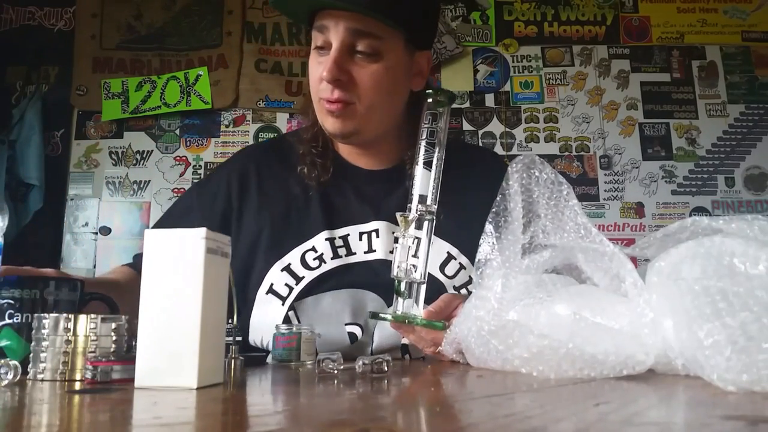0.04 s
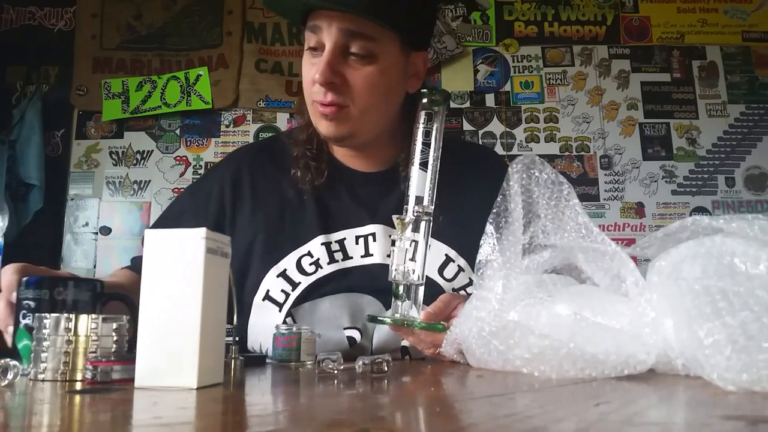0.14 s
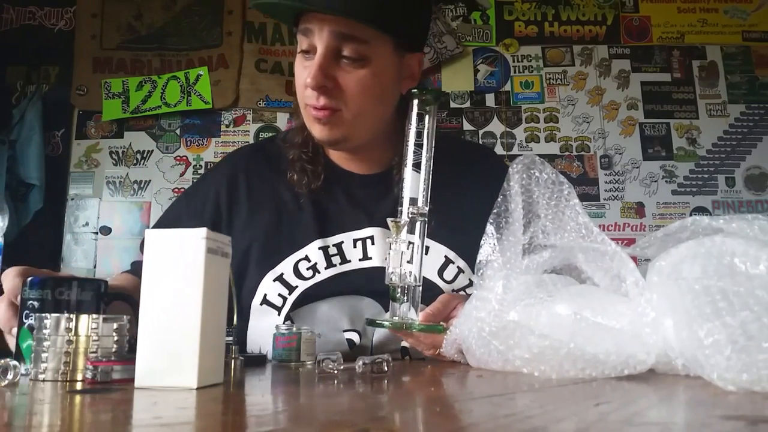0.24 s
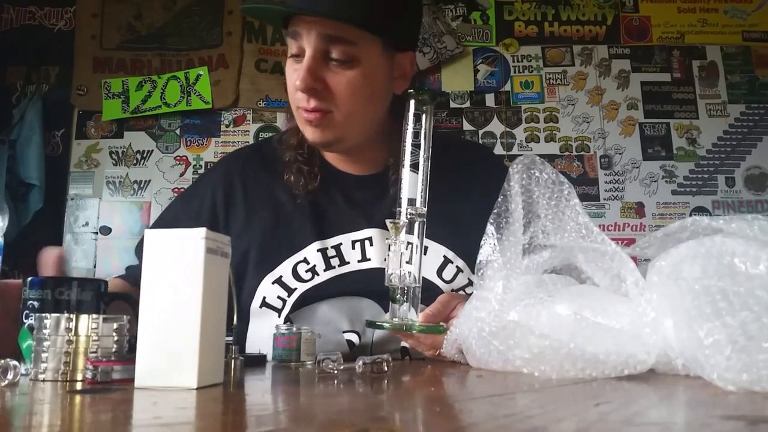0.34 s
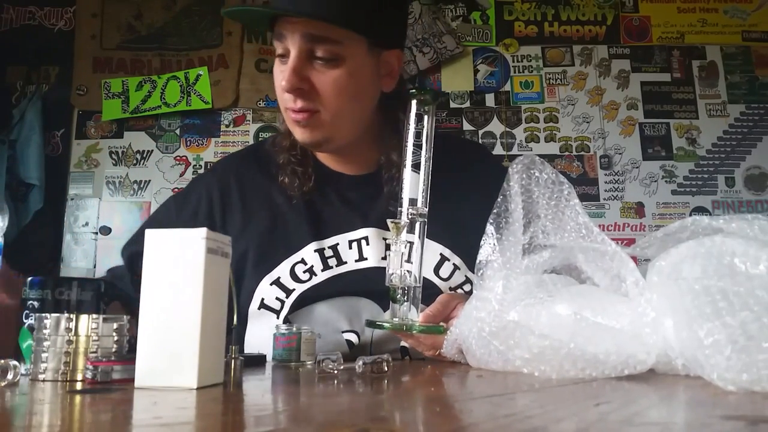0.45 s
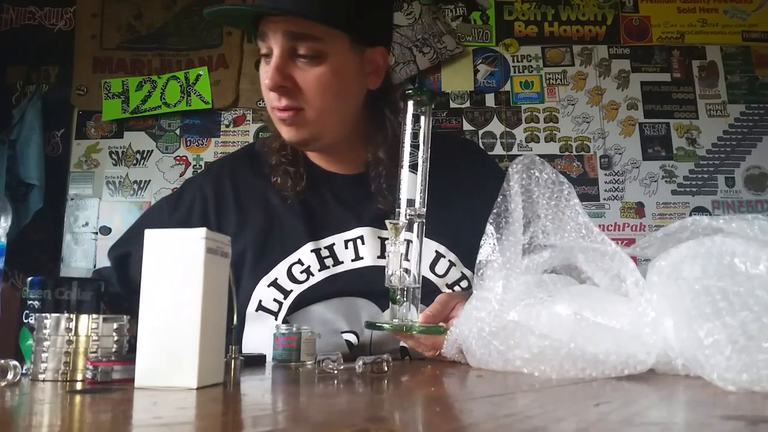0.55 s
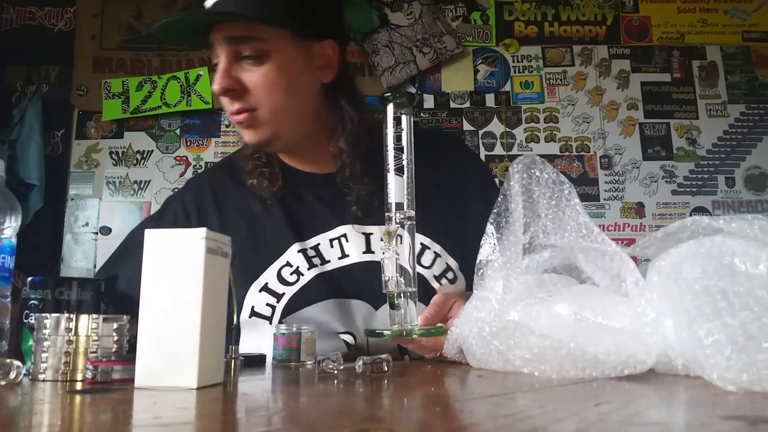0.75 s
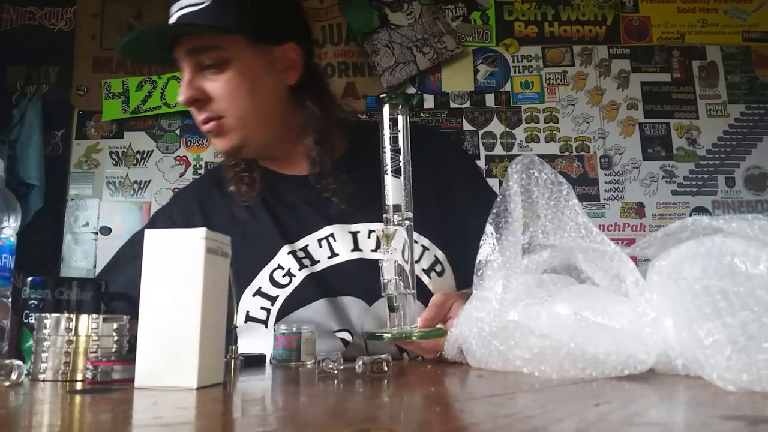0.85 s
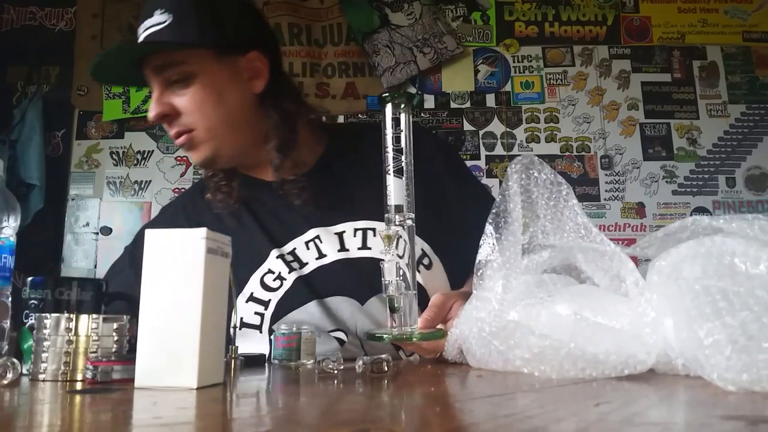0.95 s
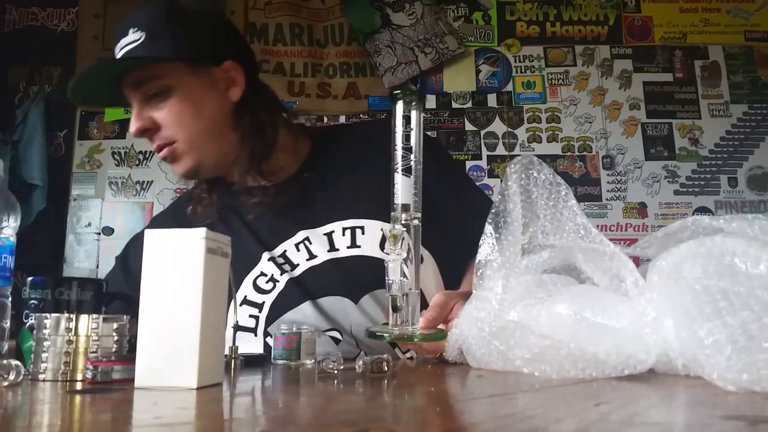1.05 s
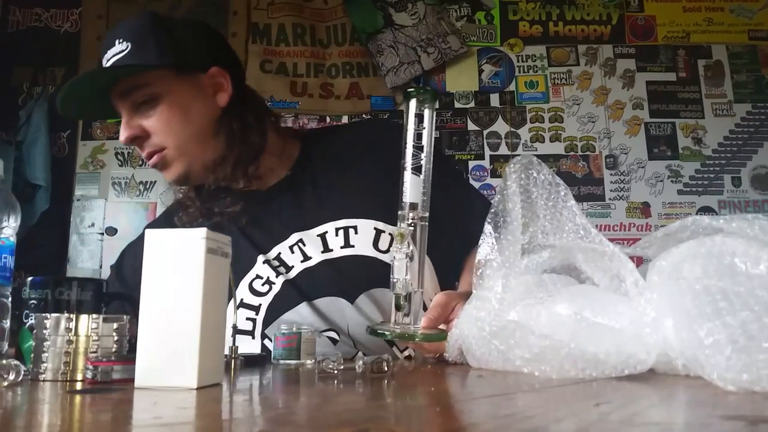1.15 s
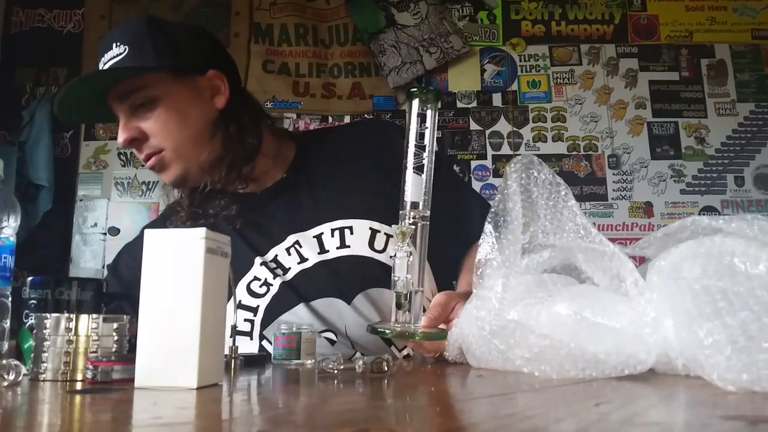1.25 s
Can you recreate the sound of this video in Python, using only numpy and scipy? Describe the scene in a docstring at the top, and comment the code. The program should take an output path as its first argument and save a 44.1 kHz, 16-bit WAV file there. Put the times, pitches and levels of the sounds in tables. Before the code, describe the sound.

A glass piece is set down hard on a wooden table with a sharp, ringing clink

```python
"""A small room, a wooden table and two microphones. Plastic wrap crackles faintly while things bump and shuffle,
and a glass piece rasps as it slides out, ending in a short groan: filtered noise and a wavering sine.
At 0.22 s the glass is set down hard: decaying modes clink and boom under bursts of noise.
Soft bumps, light knocks, hollow thumps and two faint tings follow, from clicked resonators and dying noise;
the wrap ticks and things shuffle on to the end, over a steady floor of coloured noise."""
import sys
import numpy as np
from scipy import signal
from scipy.fft import rfft, irfft
from scipy.io import wavfile
from scipy.ndimage import uniform_filter1d

SR = 44100
rng = np.random.default_rng(int(sys.argv[2]) if len(sys.argv) > 2 else 0)


def inscribe(sig):
    """Save sig as 16-bit PCM at rate SR to the path in sys.argv[1].

    A 1-D sig is mono; a 2-D sig holds one channel per row.
    Samples are clipped to [-1, 1] before scaling.
    """
    pcm = np.round(np.clip(np.atleast_2d(sig).T, -1, 1) * 32767)
    wavfile.write(sys.argv[1], SR, pcm.astype(np.int16))


N = 57330
TIME = np.arange(N) / SR
FREQS = np.maximum(np.fft.rfftfreq(2 * N, 1 / SR), 1)
ROOM_T60_S = 0.25

# the glass meets the table and rocks once: (time [s], strength [dB])
CLINKS = [(0.2248, 0.5), (0.2272, -2), (0.2335, -19.5)]
# relative spectrum of the bright crack of a hard contact: (frequency [Hz], level [dB])
CRACK_SPECTRUM = [(4500, -22.5), (7500, -23.5), (9300, -25.5), (10700, -11), (12500, 3.5), (14500, 1),
                  (15800, -5.5)]
# relative spectrum of a knock on the table: (frequency [Hz], level [dB])
KNOCK_SPECTRUM = [(150, -13), (280, -24), (400, 0), (600, 0), (950, -4.5), (1500, -12.5), (2100, -5.5),
                  (2800, -9), (3400, -38), (5000, -30.5)]


def from_db(db):
    """Decibels to gain."""
    return 10 ** (np.asarray(db) / 20)


def rms_one(x):
    """Scale to unit rms."""
    return x / np.sqrt(np.mean(x ** 2) + 1e-20)


def pan(db):
    """Left and right gains for a level difference; positive is louder on the left."""
    return rms_one(from_db([[db / 2], [-db / 2]]))


def level(rows):
    """Gain over time from (time [s], level [dB]) points."""
    return from_db(np.interp(TIME, *np.transpose(rows)))


def clicks(rows):
    """One impulse for each (time [s], level [dB])."""
    out = np.zeros(N)
    for s, db in rows:
        out[int(s * SR)] += from_db(db)
    return out


def white():
    """White noise, partly alike at the two microphones."""
    likeness = 0.1  # correlation of left and right
    mid, side = rng.standard_normal((2, N))
    return rms_one(np.sqrt(1 + likeness) * mid + np.sqrt(1 - likeness) * side * [[1], [-1]])


def gains(spectrum):
    """Gain at each of FREQS from (frequency [Hz], level [dB]) points."""
    hz, db = np.transpose(spectrum)
    return from_db(np.interp(np.log(FREQS), np.log(hz), db))


def filtered(x, gain):
    """Causal minimum-phase filter, made through the cepstrum, with the given gain at each of FREQS."""
    cepstrum = irfft(np.log(gain + 1e-6))[:N]
    response = np.exp(2 * rfft(cepstrum, 2 * N) - cepstrum[0])
    return irfft(rfft(x, 2 * N) * response)[..., :N]


def colour(x, spectrum):
    """Give a noise a spectrum that falls away beyond its end points, keeping its power."""
    top_fall = np.sqrt(1 + (FREQS / spectrum[-1][0]) ** 20)
    bottom_fall = 1 + (spectrum[0][0] / 2 / FREQS) ** 2
    return filtered(x, rms_one(gains(spectrum) / top_fall / bottom_fall))


def lowpass(x, order, hz):
    """Soften a contact by removing what lies above hz."""
    return signal.sosfilt(signal.butter(order, hz, fs=SR, output="sos"), x)


def dying(hits, t60):
    """Envelope whose energy jumps at each hit and dies away by 60 dB in t60 seconds."""
    keep = from_db(-60 / (t60 * SR)) ** 2
    return np.sqrt(signal.lfilter([1], [1, -keep], hits ** 2 + 1e-24))


def ring(hits, hz, t60):
    """A damped resonator: a unit click sets a sine of height 1 ringing."""
    r, w = from_db(-60 / (t60 * SR)), 2 * np.pi * hz / SR
    return signal.lfilter([0, np.sin(w)], [1, -2 * r * np.cos(w), r * r], hits + 1e-18)


def room(x):
    """Diffuse reflections of the small room: convolution with dying noise."""
    tail = white() * from_db(-60 * TIME / ROOM_T60_S)
    return signal.fftconvolve(x, rms_one(tail) / np.sqrt(N), axes=1)[:, :N]


def set_down():
    """The hard blow rings the glass and the tabletop and adds a boom, a clack and a bright crack."""
    return glass() + tabletop() + blow_noise()


def glass():
    """Glass modes build up and die away; the higher ones flutter more as the piece settles."""
    # modes of the glass: (frequency [Hz], level [dB], t60 [s], left-right [dB], build-up time constant [s])
    glass_modes = [ (2481, -23.5, .25, -1, .001), (2607, -25, .24, 1, .001), (2655, -24.5, .24, 2, .001),
                   (3541, -11.5, .074, 6, .018), (6535, -22, .18, -4, .05), (11850, -34, .24, 6, .002),
                   (12060, -34, .26, 12, .002), (8500, -44, .2, 0, .012), (9450, -52, .21, 12, .004),
                   (9722, -48, .25, 15, .004), (7940, -27, .2, 11, .012), (8231, -37, .17, 5, .012),
                   (2230, -54, 0.098, 11.5, .001), (2728, -37.5, .23, -3, .001),
                   (2934, -38, 0.13, -6.5, .001), (4294, -39, 0.062, -4, 0.00097),
                   (4950, -50.5, 0.15, 6.5, .001), (5564, -56, 0.36, 8, 0.003), (6120, -44.5, .2, 3, .04),
                   (13900, -36, .18, -6, 0.00096), (14430, -42.5, 0.22, 1.5, 0.0011),
                   (15110, -42, .18, 13.5, .001)]
    flutter_per_octave, flutter_from_hz, flutter_per_s = 0.27, 1400, 350
    hit = clicks(CLINKS[:1])
    age = np.maximum(TIME - CLINKS[0][0], 0)
    direct = 0
    for k, (hz, db, t60, side, build_s) in enumerate(glass_modes):
        chance = np.interp(age * flutter_per_s, np.arange(1000), rng.standard_normal(1000))
        flutter = 1 + flutter_per_octave * np.log2(hz / flutter_from_hz) * chance
        build_up = 1 - np.exp(-age / build_s)
        mode = from_db(db) * build_up * flutter * ring(hit, hz, t60)
        direct = direct + pan(side) * mode * (-1) ** k  # alternating polarity
    return direct + from_db(-6) * room(direct)


def tabletop():
    """The first contact sets the wooden top's modes ringing, with their reflections."""
    # modes of the tabletop: (frequency [Hz], level [dB], t60 [s], left-right [dB])
    table_modes = [ (140, -25, .33, -5), (242, -14.5, .23, -6), (339.5, -24.5, .28, -3), (717, -22, .18, 5),
                   (1241, -53, .64, 18), (219, -35.5, 0.44, -10), (120.3, -28.5, .33, -14),
                   (445.5, -31.5, 0.17, -1.5), (530.4, -26.5, 0.19, -10.5), (587, -26.5, 0.26, 10.5),
                   (652, -33.5, .24, -5), (876.5, -41.5, 0.35, 6.5)]
    hit = clicks(CLINKS[:1])
    direct = 0
    for k, (hz, db, t60, side) in enumerate(table_modes):
        direct = direct + pan(side) * from_db(db) * ring(hit, hz, t60) * (-1) ** k
    return direct + from_db(-9.5) * room(direct)


def blow_noise():
    """Noise for what is too dense for single modes: a low boom, a short clack and a crack far to the left."""
    # relative spectrum of the dense ring of table and room: (frequency [Hz], level [dB])
    boom_spectrum = [(50, -35.5), (110, -6.5), (260, 4), (700, -4.5), (950, -13.5), (2000, -16),
                     (2700, -6.5), (3300, -24), (4300, -30.5), (6000, -47.5)]
    boom_db, boom_t60_s, boom_attack_s = -21.5, 0.3, 0.0009
    clack_db, clack_t60_s = -17.5, 0.0068
    crack_db, crack_t60_s = -16, 0.014
    crack_tail_db, crack_tail_t60_s = -30.5, 0.24
    hits, first = clicks(CLINKS), clicks(CLINKS[:1])
    swell = 1 - np.exp(-np.maximum(TIME - CLINKS[0][0], 0) / boom_attack_s)
    boom = from_db(boom_db) * colour(white() * swell * dying(hits, boom_t60_s), boom_spectrum)
    clack = from_db(clack_db) * colour(white() * dying(hits, clack_t60_s), KNOCK_SPECTRUM)
    crack = from_db(crack_db) * dying(first, crack_t60_s)
    crack = crack + from_db(crack_tail_db) * dying(hits, crack_tail_t60_s)
    return boom + pan(db=-6) * clack + pan(db=24.5) * colour(white() * crack, CRACK_SPECTRUM)


def bumps():
    """Soft contacts sound the table's lowest mode, with a dull noise thud."""
    # soft bumps on the table: (time [s], level [dB])
    bump_times = [(0.004, -37), (0.024, -36), (0.058, -36), (0.14, -42), (0.619, -36.5), (0.628, -32.5),
                  (0.688, -38), (0.755, -31.5), (0.812, -37), (0.91, -34.5), (0.994, -35), (1.136, -34),
                  (1.22, -39), (1.262, -30), (1.283, -31)]
    # relative spectrum of the thud: (frequency [Hz], level [dB])
    thud_spectrum = [(40, -7.5), (90, 8.5), (170, -2), (300, -4.5), (480, -7.5), (800, -21.5), (2000, -43)]
    mode_hz, t60_s, softness_hz, thud_db = 101.5, 0.33, 171, -12.5
    lag_s = 0.0041  # the lowest mode swings out of step on the left
    hits = clicks(bump_times)
    low = ring(lowpass(hits, 2, softness_hz), mode_hz, t60_s)
    low_pair = np.array([np.interp(TIME - lag_s, TIME, low), low])
    thud = from_db(thud_db) * colour(white() * dying(hits, t60_s), thud_spectrum)
    return pan(db=-8.5) * low_pair + thud


def thumps():
    """Padded contacts ring a few quickly damped modes: short, hollow thumps with faint reflections."""
    # padded contacts: (time [s], level [dB])
    thump_times = [(1.138, -37), (1.262, -38)]
    # their hollow modes: (frequency [Hz], level [dB], t60 [s])
    hollow_modes = [(200, -6, 0.15), (248, -0.5, 0.071), (302, -11, .08)]
    hits = clicks(thump_times)
    hollow = 0
    for k, (hz, db, t60) in enumerate(hollow_modes):
        hollow = hollow + from_db(db) * ring(hits, hz, t60) * (-1) ** k
    direct = pan(db=-12) * hollow
    return direct + from_db(-15) * room(direct)


def knocks():
    """Moved things knock: a click, a short burst of noise with a tail, and a little ring of modes."""
    # light knocks of things being moved: (time [s], level [dB])
    knock_times = [(0.124, -41), (0.642, -55.5), (0.767, -55.5), (0.9, -62.5), (0.943, -57.5),
                   (0.9595, -41.5), (0.9935, -35), (1.0075, -34.5), (1.13, -55), (1.166, -50.5),
                   (1.206, -44)]
    # modes of the knocked things: (frequency [Hz], level [dB], t60 [s])
    knock_modes = [(369.6, -6.5, 0.18), (454.5, -7, 0.13), (591, -7, 0.04), (907, -14, 0.19),
                   (2820, -17, 0.3)]
    t60_s, tail_db, tail_t60_s = 0.031, -11.5, 0.25
    click_db, softness_hz = 8, 3300
    hits = clicks(knock_times)
    envelope = dying(hits, t60_s) + from_db(tail_db) * dying(hits, tail_t60_s)
    clack = colour(white() * envelope + from_db(click_db) * hits, KNOCK_SPECTRUM)
    push = lowpass(hits, 4, softness_hz)
    modes = sum(from_db(db) * ring(push, hz, t60) for hz, db, t60 in knock_modes)
    return pan(db=3.5) * (clack + modes)


def tings():
    """A glass touched lightly: one faint, high mode, toward the left."""
    # light touches: (time [s], level [dB])
    ting_times = [(0.958, -54.5), (1.01, -58.5)]
    return pan(db=11) * ring(clicks(ting_times), hz=10460, t60=0.14)


def sliding():
    """Friction of the sliding glass: noise through two narrow resonances."""
    # level of the rasp: (time [s], level [dB])
    slide_level = [(0, -49), (0.04, -49), (0.075, -44.5), (0.125, -48), (0.16, -50.5), (0.22, -61),
                   (0.25, -91)]
    # its resonances: (frequency [Hz], width [Hz], relative level [dB])
    resonances = [(1775, 236, 0), (2036, 170, -7)]
    friction = white()
    rasp = 0
    for hz, width, db in resonances:
        band = signal.butter(2, [hz - width / 2, hz + width / 2], "band", fs=SR, output="sos")
        rasp = rasp + from_db(db) * rms_one(signal.sosfilt(band, friction))
    return pan(db=1.5) * level(slide_level) * rasp


def groan():
    """The slide ends in a short stick-slip groan: a sine of wavering pitch, swelling and fading."""
    centre_s, width_s, pitch_hz, peak_db = 0.189, 0.026, 332, -34
    waver_depth = 0.039  # rms share of the pitch
    waver = rms_one(uniform_filter1d(rng.standard_normal(N), size=600))
    slips = np.sin(2 * np.pi * np.cumsum(pitch_hz * (1 + waver_depth * waver)) / SR)
    return from_db(peak_db) * np.exp(-((TIME - centre_s) / width_s) ** 2) * slips


def shuffling():
    """Things shuffle over the table: dull friction noise that swells and sinks."""
    # level of the shuffling: (time [s], relative level [dB])
    shuffle_level = [(0, -53.5), (0.035, -44.5), (0.1, -49), (0.165, -40), (0.22, -37), (0.4, -51.5),
                     (0.58, -60), (0.9, -63.5), (1.0, -42), (1.1, -56), (1.145, -47), (1.19, -50),
                     (1.26, -39.5), (1.3, -43)]
    # its relative spectrum: (frequency [Hz], level [dB])
    shuffle_spectrum = [(71, -9), (120, -4.5), (266, -3.5), (563, -13), (769, -18.5), (1370, -22),
                        (1680, -30.5), (3830, -29.5), (5000, -38), (6500, -80), (11000, -120)]
    return pan(db=2.0) * level(shuffle_level) * colour(white(), shuffle_spectrum)


def wrap():
    """Plastic wrap: dense random grains make a fine crackle, and single noise bursts louder ticks."""
    # ticks of the wrap: (time [s], relative level [dB], left-right [dB])
    ticks = [(0.069, -40, 15), (0.149, -46, 17), (0.188, -72, 3), (0.3553, -34, 15), (0.4146, -38.5, 13),
             (0.642, -46.5, 5), (0.753, -64, 5.5), (0.766, -45.5, 11), (0.792, -44, 8), (0.9, -52, -3),
             (0.94, -36, 19), (0.957, -46, 9), (1.118, -45, 15), (1.178, -65, 12), (1.196, -37.5, 27)]
    # level of the fine crackle: (time [s], relative level [dB])
    crackle_level = [(0, -53.5), (0.1, -51.5), (0.21, -46), (0.36, -51.5), (0.44, -55.5), (0.52, -61.5),
                     (0.62, -68.5), (0.66, -69), (0.73, -64.5), (0.8, -69), (0.91, -72), (0.94, -62.5),
                     (1.05, -61.5), (1.19, -57), (1.21, -44), (1.29, -51.5)]
    # relative spectrum of the lower, drier part of each tick: (frequency [Hz], level [dB])
    snap_spectrum = [(1200, -14.5), (2400, -11.5), (4000, 6.5), (5500, -10.5)]
    crackles_per_s, spread_db, crackle_db = 1200, 1, -1
    tick_t60_s, tail_db, snap_db = 0.0053, -15.5, -5.5
    strength_db = spread_db * np.minimum(rng.exponential(1, N), 5)
    grains = (rng.random(N) < crackles_per_s / SR) * from_db(strength_db)
    crackle = rms_one(dying(grains, t60=0.011)) * level(crackle_level)
    crackle = pan(db=10.5) * from_db(crackle_db) * crackle
    hits = sum(pan(side) * clicks([(s, db)]) for s, db, side in ticks)
    tick = dying(hits, tick_t60_s) + from_db(tail_db) * dying(hits, ROOM_T60_S)
    bright = colour(white() * (crackle + tick), CRACK_SPECTRUM)
    return bright + from_db(snap_db) * colour(white() * tick, snap_spectrum)


def room_floor():
    """Steady room hum and hiss, as coloured noise."""
    # relative spectrum of the room: (frequency [Hz], level [dB])
    floor_spectrum = [(25, -22), (60, -1.5), (102, 2.5), (200, -18), (300, -4.5), (500, -17), (800, -28.5),
                      (1250, -26.5), (1700, -54), (2300, -29), (2780, -25.5), (3200, -27.5), (3900, -11.5),
                      (4700, -23), (5400, -32), (7000, -36), (10000, -63)]
    return from_db(-53.5) * colour(white(), floor_spectrum)


def scene():
    """All the handling at the table over the room's floor."""
    contacts = set_down() + bumps() + thumps() + knocks() + tings()
    friction = sliding() + groan() + shuffling()
    return contacts + friction + wrap() + room_floor()


def record(dry):
    """The microphone colours the treble and the top is cut steeply."""
    # a dip in the microphone's treble: (frequency [Hz], level [dB])
    treble_dip = [(4800, -1), (5700, -6.5), (6300, -13.5), (7500, -25.5), (8700, -14), (9500, -6.5),
                  (10300, -4)]
    cutoff_hz = 15700
    steep = signal.ellip(10, .1, 80, cutoff_hz, fs=SR, output="sos")
    return signal.sosfilt(steep, filtered(dry, gains(treble_dip)))


dry = scene()
out = record(dry)
inscribe(out)
```